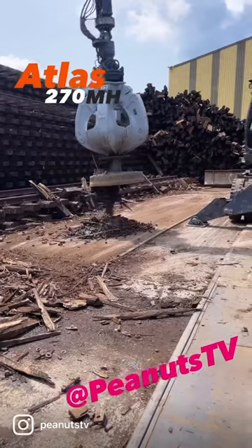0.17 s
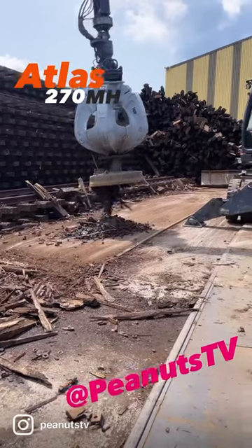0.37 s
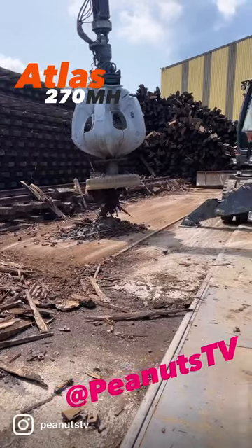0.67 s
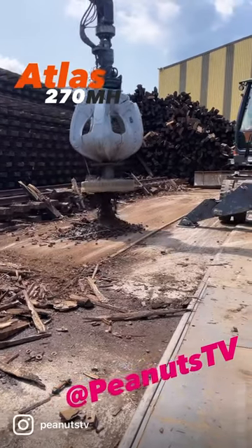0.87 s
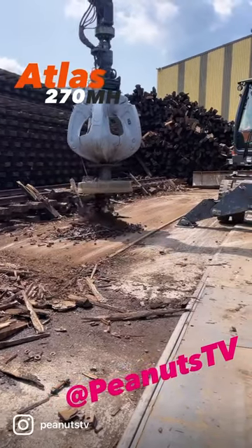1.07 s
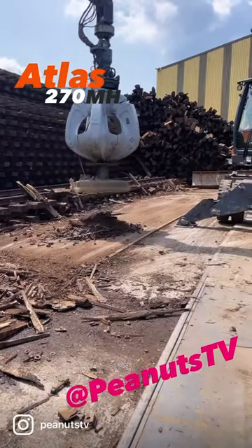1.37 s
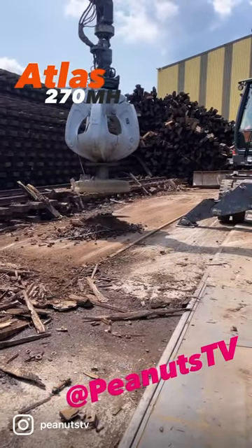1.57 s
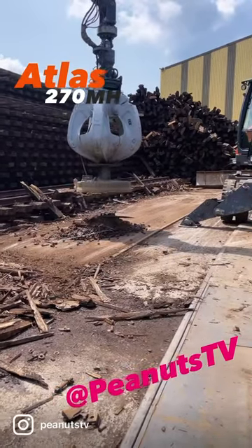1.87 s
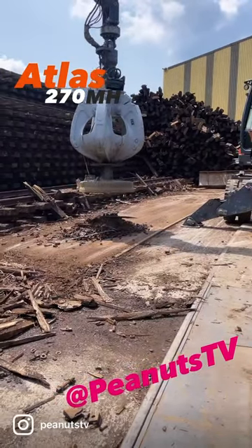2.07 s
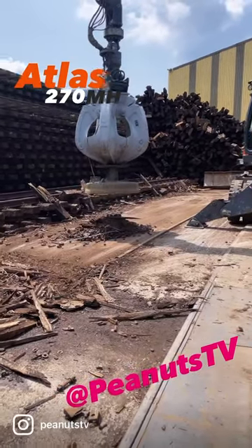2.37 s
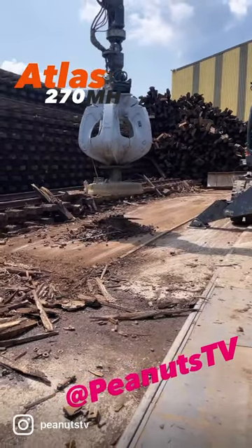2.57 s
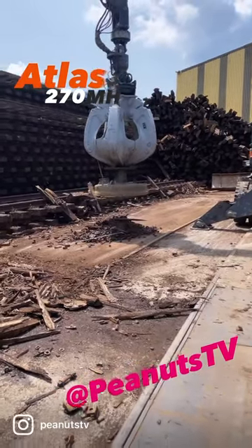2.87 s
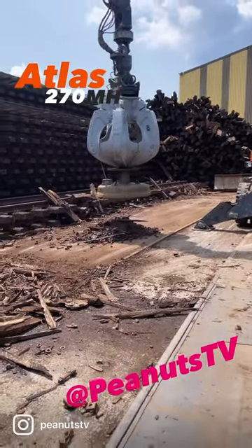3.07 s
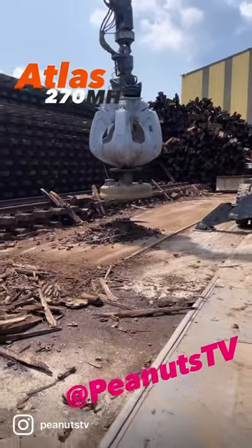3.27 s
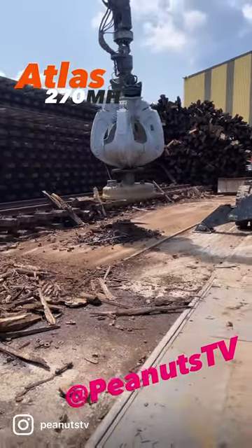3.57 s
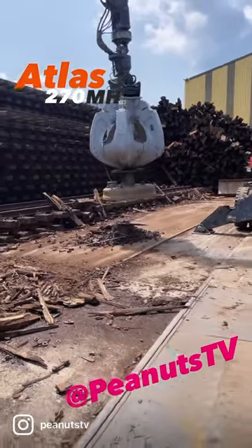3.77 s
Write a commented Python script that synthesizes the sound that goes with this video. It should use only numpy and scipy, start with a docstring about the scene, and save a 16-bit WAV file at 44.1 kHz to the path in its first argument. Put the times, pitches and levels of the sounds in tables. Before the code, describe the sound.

A load of metal pieces crashes and jingles onto a pile beside a droning diesel machine.

```python
"""Scrap yard: steel pieces let go by a lifting magnet pour onto a heap on concrete, over a diesel handler.
Small contacts are cracks with scattered modes; heavier pieces strike and rattle.
Loose bars jingle, short bars clink with clear notes, a late plate rings on; the yard echoes the steel.
Diesel tones, throbbing noise and a hydraulic pump's hum run throughout.
Gain control ducks under the clatter and slowly recovers; a band limit cuts the top."""
import sys
import numpy as np
from scipy import signal
from scipy.fft import rfft, irfft, next_fast_len
from scipy.io import wavfile
from scipy.ndimage import uniform_filter1d, map_coordinates

SR = 44100
rng = np.random.default_rng(int(sys.argv[2]) if len(sys.argv) > 2 else 0)


def put_to_file(sound):
    """Save the sound as 16-bit audio at rate SR, in the file named by the first command-line argument."""
    columns = np.atleast_2d(sound).T  # one column per channel
    safe = np.clip(columns, -1, 1)
    whole_steps = np.round(safe * 32767)
    wavfile.write(sys.argv[1], SR, whole_steps.astype(np.int16))


N = 172872  # samples, 3.92 s

# Pouring scrap. Each row: time in seconds, relative level in dB.
POUR_LEVEL = [(.67, -48), (.695, -28.5), (.755, -31), (.79, -22), (.94, -20), (1.14, -16.5), (1.18, -22.5),
              (1.42, -30.5), (1.65, -34), (1.78, -42), (2.1, -48)]
# Colour of small scrap. Each row: frequency in Hz, gain in dB.
SCRAP_COLOUR = [(200, -11.5), (700, -3.5), (1050, -8.5), (1550, -10.5), (2050, 1.5), (2700, 1), (3700, -3),
                (4400, 5), (5100, 2.5), (5900, -3.5), (10000, -4.5), (12000, -13), (13400, -8)]
# Hard landings. Each row: start in seconds, relative level in dB, weight (low gain) in dB,
# brightness (high gain) in dB, rattle decay time constant in seconds.
HARD_HITS = [(0.7414, -10.5, -9.5, -1.5, 0.004), (0.8342, -18.5, 3, 1, .015),
             (0.869, -12.5, 0.5, 0.5, 0.0062), (0.908, -16, 9.5, -12, 0.015), (0.937, -17, 4.5, -7, 0.026),
             (1.007, -14.5, 8, -2, 0.0069), (1.02, -13, 3, 0, 0.007), (1.068, -20.5, 3, 8, 0.023),
             (1.117, -9.5, 3.5, -7, .022), (1.33, -22.5, -0.5, 1, .018), (1.461, -22.5, 9, -1, 0.0094),
             (1.489, -22, 7, -10, 0.014), (1.612, -32, -6, 11.5, .02), (1.6764, -16, -6.5, 6, 0.025),
             (1.8424, -30, 9, -7, 0.0056)]
# Notes of the loose bars. Each row: centre frequency in Hz, relative level in dB.
BAR_NOTES = [(2062, -10), (2853, -9), (3440, -5), (4124, -1.5), (4400, 0), (4830, -5), (5040, -0.5),
             (8950, -5), (10280, -18), (11655, -10.5)]
# Jingle of the loose bars. Each row: time in seconds, level in dB, tilt in dB per octave.
JINGLE_LEVEL = [(.68, -65, -3), (.82, -29, 1), (1.12, -24.5, -1), (1.25, -29.5, 2), (1.62, -37.5, 5.5),
                (1.78, -69, 4)]
# Clinking short bars. Each row: start in seconds, initial note in Hz, level in dB, chatter hold in seconds.
BAR_CLINKS = [(.762, 4800, -21, 0.034), (.835, 5280, -19, .02), (.858, 5510, -22, 0.026),
              (1.046, 4400, -17, 0.042), (1.12, 5060, -16, 0.022), (1.331, 5060, -21.5, 0.029),
              (1.438, 4110, -24, 0.021), (1.573, 4130, -22, 0.019), (1.866, 5060, -31.5, 0.03),
              (1.861, 4450, -33.5, 0.027), (1.998, 4330, -42, 0.19), (2.086, 4295, -33, 0.017),
              (1.95, 4985, -47, .25)]
# Modes of a small plate. Each row: frequency in Hz, level in dB, T60 in seconds.
PLATE_MODES = [(4086, -21, 0.13), (5030, -32, 0.23), (5660, -22, 0.28), (6309, -21, .21), (8540, -23, .35)]
# Phase between microphone ports. Each row: frequency in Hz, left lead in radians.
PORT_PHASE = [(1800, .1), (2450, 2), (2900, 6), (3400, 6), (4000, 7.4), (5200, 6.5), (8300, 9.5),
              (13000, 15)]
# Level between microphone ports. Each row: frequency in Hz, left over right in dB.
PORT_BALANCE = [(2000, 0.5), (2800, 10), (3500, -9), (4200, -0.5)]
# Echo decay of the yard. Each row: frequency in Hz, T60 in seconds.
YARD_T60 = [(300, 0.74), (4000, .45), (12000, 0.16)]
# Diesel tones. Each row: multiple of the shaft rate, mean level in dB.
DIESEL_ORDERS = [(2, -42), (3, -29), (5, -25), (6, -43), (10, -43.5), (20, -44.5)]
# Hydraulic pump. Each row: time in seconds, mean pitch in Hz, mean level in dB.
PUMP_TRACK = [(.2, 270, -41), (.45, 267.2, -32), (2, 272.4, -42), (2.85, 264.4, -34.5),
              (3.15, 271.3, -33.5), (3.45, 266, -36), (3.92, 261.4, -31.5)]
# Colour of engine and fan noise. Each row: frequency in Hz, relative gain in dB.
ROAR_COLOUR = [(22, -33), (36, -18.5), (54, 0.5), (110, 2), (200, -3), (330, -10), (750, -9.5),
               (1100, -18.5), (1550, -23), (2200, -22), (3300, -32), (5200, -30.5), (7600, -46.5),
               (10800, -37.5), (12400, -47.5), (13500, -62)]
# Left-right likeness of that noise. Each row: frequency in Hz, correlation from -1 to 1.
ROAR_ALIKE = [(120, 0.99), (270, 0.95), (1100, 0.64), (6500, 0.078)]
# Gain of the whole machine. Each row: time in seconds, gain in dB.
MACHINE_GAIN = [(.6, 0.86), (2, -.7), (3.92, -0.3)]

CONTACTS_PER_S, SIZE_SPREAD_DB = 280, 5
PIECE_T60_S, PIECE_CRACK_RATIO, CRACK_T60_S = 0.13, 0.83, 0.013
HIT_CONTACTS_PER_S, HIT_T60_S, HIT_CRACK_RATIO = 500, 0.11, 1
WEIGHT_HZ, BRIGHT_HZ = 2040, 9800
KNOCKS_PER_BAR_PER_S, BAR_T60_S, TILT_PIVOT_HZ, BAR_DETUNE_RATIO = 26, 0.2, 4540, 0.0123
CLINK_T60_S, CLINK_RISE_S, CLINK_OVERTONE_DB, CLINK_SAG_HZ_PER_S = 0.15, 0.0029, -21, 219
CHATTER_PER_S, CHATTER_JITTER_RAD, CHATTER_DB = 124, 0.4, 3
PLATE_START_S = 1.682
YARD_DB = -10
SHAFT_HZ, SHAFT_DRIFT_RATIO, TONE_WAVER_DB = 30.31, 0.00408, 1.13
PUMP_OCTAVE_DB, PUMP_DRIFT_RATIO = -7, 0.0051
ROAR_DB, FIRING_DEPTH = -26, 0.09
THRESHOLD_DB, DUCK_DB_PER_DB, RECOVER_DB_PER_S, LISTEN_S = -18, 0.78, 5, 0.031
TOP_HZ = 13400


def amp(db):
    """Decibels to amplitude gain."""
    return 10 ** (np.asarray(db) / 20)


def unit(x):
    """Scale to rms 1."""
    return x / np.sqrt(np.mean(x ** 2) + 1e-20)


def decay(t, t60_s):
    """Exponential fade, 60 dB in t60_s."""
    return np.exp(-np.log(1000) * t / t60_s)


def along(points, hz):
    """Interpolate (Hz, value) points on a log frequency axis."""
    f, v = np.transpose(points)
    return np.interp(np.log(hz + 1), np.log(f + 1), v)


def curves(rows):
    """One value per sample for each column after the time."""
    s, *cols = np.transpose(rows)
    return [np.interp(np.arange(N) / SR, s, c) for c in cols]


def wobble(knots_per_s):
    """A smooth random curve through normal random knots."""
    at = np.arange(0, N + 128, 128)
    knots = rng.standard_normal(512)
    return np.interp(np.arange(N), at, map_coordinates(knots, [at * knots_per_s / SR], mode="wrap"))


def coloured(x, db_at):
    """Causal minimum-phase filter, by folded cepstrum, whose gain is db_at(hz)."""
    n = x.shape[-1]
    m = 2 * next_fast_len(n // 2 + 4096)
    gain = np.maximum(amp(db_at(np.fft.rfftfreq(m, 1 / SR))), 1e-6)
    cepstrum = irfft(np.log(gain))
    cepstrum[1:m // 2] *= 2
    cepstrum[m // 2 + 1:] = 0
    return irfft(rfft(x, m) * np.exp(rfft(cepstrum)), m)[..., :n]


def add(track, start_s, sound):
    """Mix a sound in at a time."""
    part = track[int(start_s * SR):][:len(sound)]
    part += sound[:len(part)]


def piece(t60_s, crack_ratio, count=20):
    """One contact of an odd-shaped piece: a noise crack and scattered decaying modes, energy 1."""
    t = np.arange(SR // 5, dtype=np.float32) / SR
    hz = 600 + 12800 * (np.arange(count) + rng.random(count)) / count
    mode_t60_s = t60_s * np.exp(0.5 * rng.standard_normal(count))
    fade = np.exp(np.float32(-np.log(1000) / mode_t60_s)[:, None] * t)
    modes = np.sin(np.float32(2 * np.pi * hz)[:, None] * t) * fade
    ring = np.sum(rng.standard_normal((count, 1)) * modes, axis=0)
    crack = rng.standard_normal(len(t)) * decay(t, CRACK_T60_S)
    return unit(unit(ring) + crack_ratio * unit(crack)) / np.sqrt(len(t))


def pour(count=70):
    """Many pieces strike the heap at random moments with random strengths."""
    level_db, = curves(POUR_LEVEL)
    out = np.zeros(N)
    shapes = [piece(PIECE_T60_S, PIECE_CRACK_RATIO) for _ in range(count)]
    begin_s, end_s = POUR_LEVEL[0][0], POUR_LEVEL[-1][0]
    draws = rng.random((2048, 2))
    for k, (when, size) in enumerate(draws[:int((end_s - begin_s) * CONTACTS_PER_S)]):
        s = begin_s + (k + 2 * when) / CONTACTS_PER_S
        size_db = SIZE_SPREAD_DB * (min(-np.log(size), np.pi) - 2)
        add(out, s, amp(level_db[int(s * SR)] + size_db) * shapes[k % count])
    return out * np.sqrt(SR / CONTACTS_PER_S) * 2


def hits(count=6):
    """A hard landing is a first blow and a quick, fading rattle among its neighbours."""
    out = np.zeros(N)
    for s, db, weight_db, bright_db, rattle_s in HARD_HITS:
        shapes = [piece(HIT_T60_S, HIT_CRACK_RATIO) for _ in range(count)]
        burst = np.zeros(SR // 4)
        for k, late in enumerate(rng.random(64)[:1 + int(2 * rattle_s * HIT_CONTACTS_PER_S)]):
            delay_s = (k + late * (k > 0)) / HIT_CONTACTS_PER_S
            add(burst, delay_s, np.exp(-delay_s / rattle_s) * shapes[k % count])
        tone = [(WEIGHT_HZ, weight_db), (4500, 0), (BRIGHT_HZ, bright_db)]
        blow = coloured(burst, lambda hz: along(tone, hz))
        add(out, s, amp(db) * np.sqrt(SR / HIT_CONTACTS_PER_S) * 2 * blow)
    return out


def ringing(hz, t60_s):
    """One mode: a sine of random phase, fading exponentially."""
    t = np.arange(SR * 2 // 3) / SR
    return np.sin(2 * np.pi * (hz * t + rng.random())) * decay(t, t60_s)


def jingle():
    """Loose bars of nearly equal lengths are jostled and ping; the tilt lets the high ones settle last."""
    level_db, tilt_db = curves(JINGLE_LEVEL)
    out = np.zeros(N)
    begin_s, end_s = JINGLE_LEVEL[0][0], JINGLE_LEVEL[-1][0]
    knocks = int((end_s - begin_s) * KNOCKS_PER_BAR_PER_S)
    for hz, db in BAR_NOTES:
        octaves = np.log2(hz / TILT_PIVOT_HZ)
        for k, (when, detune) in enumerate(rng.random((256, 2))[:knocks]):
            s = begin_s + (k + when) / KNOCKS_PER_BAR_PER_S
            at = int(s * SR)
            strength_db = db + level_db[at] + tilt_db[at] * octaves
            knock_hz = hz * (1 + BAR_DETUNE_RATIO * (2 * detune - 1))
            add(out, s, 2 * amp(strength_db) * ringing(knock_hz, BAR_T60_S))
    return out


def clinks():
    """A short bar chatters on the heap: a fluttering note and weak overtone hold, sag in pitch and fade."""
    out = np.zeros(N)
    t = np.arange(SR // 2) / SR
    for s, hz, db, hold_s in BAR_CLINKS:
        envelope = (1 - np.exp(-t / CLINK_RISE_S)) * decay(np.maximum(t - hold_s, 0), CLINK_T60_S)
        jitter, flutter = (wobble(CHATTER_PER_S)[:len(t)] for _ in range(2))
        phase = 2 * np.pi * (hz - CLINK_SAG_HZ_PER_S * t / 2) * t + CHATTER_JITTER_RAD * jitter
        note = np.sin(phase) + amp(CLINK_OVERTONE_DB) * np.sin(2.3 * phase)
        add(out, s, amp(db + CHATTER_DB * flutter) * envelope * note)
    return out


def plate():
    """A small plate lands late; its modes ring on, each with its own decay."""
    out = np.zeros(N)
    add(out, PLATE_START_S, sum(amp(db) * ringing(hz, t60_s) for hz, db, t60_s in PLATE_MODES))
    return out


def ports(mono):
    """Two microphone ports differ in phase and level, half the difference on each side."""
    hz = np.fft.rfftfreq(N, 1 / SR)
    left = amp(along(PORT_BALANCE, hz) / 2) * np.exp(1j * along(PORT_PHASE, hz) / 2)
    return irfft(rfft(mono) * [left, 1 / left], N)


def yard(x):
    """Echo of walls and heaps: a stereo noise tail whose treble dies first."""
    hz, t, z = signal.stft(rng.standard_normal((2, SR // 2)), SR, nperseg=256)
    fade = decay(t, along(YARD_T60, hz)[:, None])
    tail = signal.istft(z * fade, SR, nperseg=256)[1]
    return signal.fftconvolve(x[None], tail / np.linalg.norm(tail[0]), axes=1)[:, :N]


def diesel(shaft_rad):
    """Wavering sines at multiples of the shaft rate."""
    return sum(amp(db + TONE_WAVER_DB * wobble(14)) * np.sin(k * shaft_rad + 2 * np.pi * rng.random())
               for k, db in DIESEL_ORDERS)


def pump():
    """Hydraulic hum: a drifting tone and its octave, both wavering in level."""
    hz, db = curves(PUMP_TRACK)
    phase = 2 * np.pi * np.cumsum(hz * (1 + PUMP_DRIFT_RATIO * wobble(24.99))) / SR
    level = amp(db + 1.6 * wobble(12))
    octave = amp(PUMP_OCTAVE_DB + 3 * wobble(9.1)) * np.sin(2 * phase)
    return level * (np.sin(phase) + octave)


def spread(pair, alike):
    """Mix two unrelated signals to left and right of a given likeness."""
    angle = np.arccos(np.clip(along(alike, np.fft.rfftfreq(N, 1 / SR)), -0.999, 0.999)) / 2
    mid, side = irfft(rfft(pair) * [np.cos(angle), np.sin(angle)], N)
    return np.array([mid + side, mid - side])


def roar(shaft_rad):
    """Engine and fan noise, throbbing with the firing at three pulses a shaft turn."""
    throb = 1 + FIRING_DEPTH * np.sin(3 * shaft_rad)
    noise = rng.standard_normal((2, N)) * throb * amp(0.5 * wobble(10))
    return unit(spread(coloured(noise, lambda hz: along(ROAR_COLOUR, hz)), ROAR_ALIKE))


def machine():
    """Diesel, pump and roar; one drifting shaft drives the tones and the throb."""
    shaft_rad = 2 * np.pi * np.cumsum(SHAFT_HZ * (1 + SHAFT_DRIFT_RATIO * wobble(5))) / SR
    tones = np.sqrt(2) * (diesel(shaft_rad) + pump())  # table levels become rms
    return amp(curves(MACHINE_GAIN)[0]) * (tones + amp(ROAR_DB) * roar(shaft_rad))


def scene():
    """The falling steel and its echo over the machine."""
    scrap = coloured(pour() + hits(), lambda hz: along(SCRAP_COLOUR, hz))
    steel = scrap + jingle() + plate() + clinks()
    return ports(steel) + amp(YARD_DB) * yard(steel) + machine()


def record(dry):
    """Gain control that ducks fast and recovers slowly, then the band limit."""
    window = int(LISTEN_S * SR)
    power = uniform_filter1d(np.mean(dry ** 2, axis=0), window)
    level_db = 10 * np.log10(abs(power) + 1e-9)
    wanted_db = DUCK_DB_PER_DB * np.maximum(level_db - THRESHOLD_DB, 0)
    slide_db = RECOVER_DB_PER_S * np.arange(N) / SR
    duck_db = np.maximum.accumulate(wanted_db + slide_db) - slide_db  # peak hold, linear release in dB
    levelled = dry * amp(-uniform_filter1d(duck_db, window))
    return irfft(rfft(levelled) * (np.fft.rfftfreq(N, 1 / SR) < TOP_HZ), N)


dry = scene()
out = record(dry)
put_to_file(out)
```